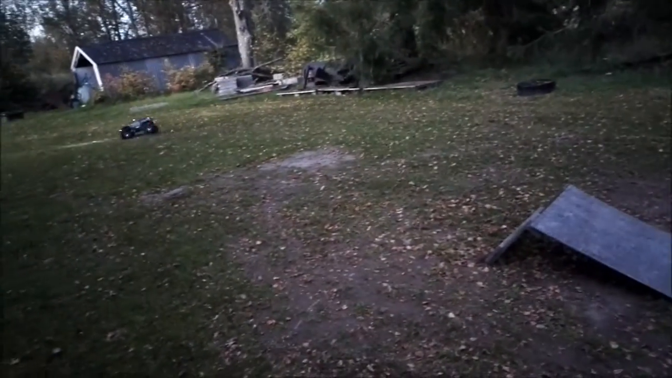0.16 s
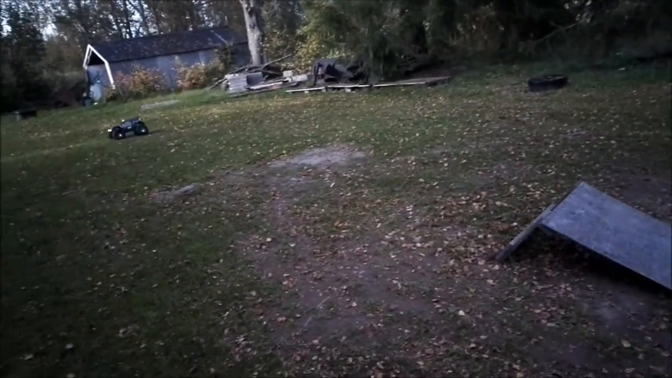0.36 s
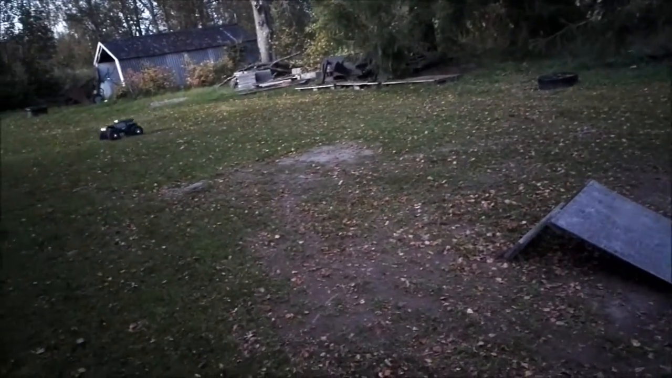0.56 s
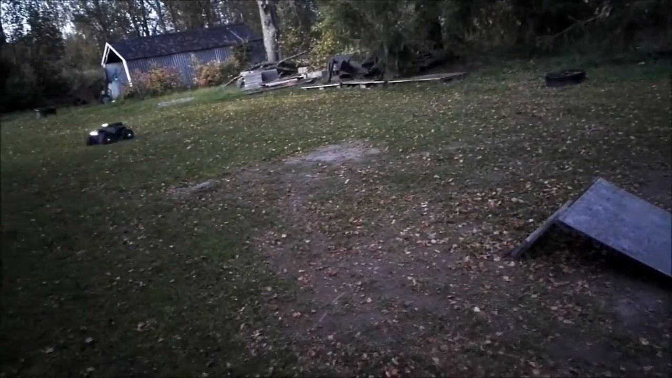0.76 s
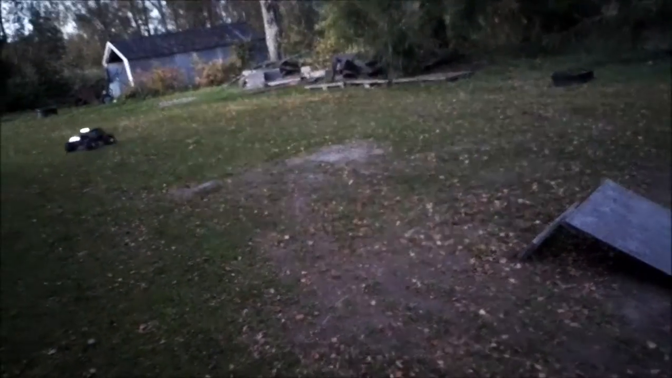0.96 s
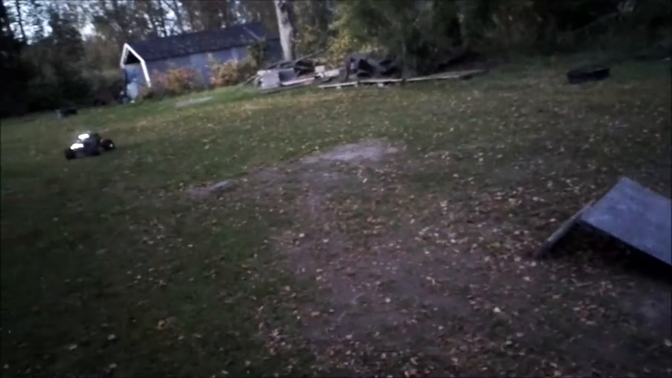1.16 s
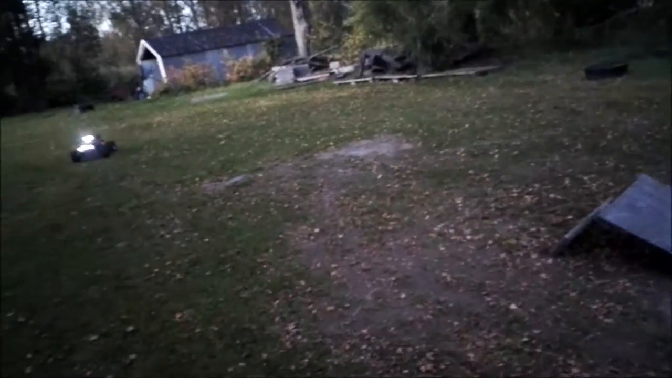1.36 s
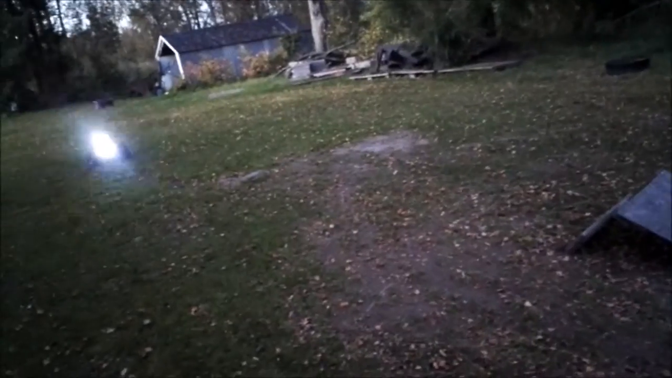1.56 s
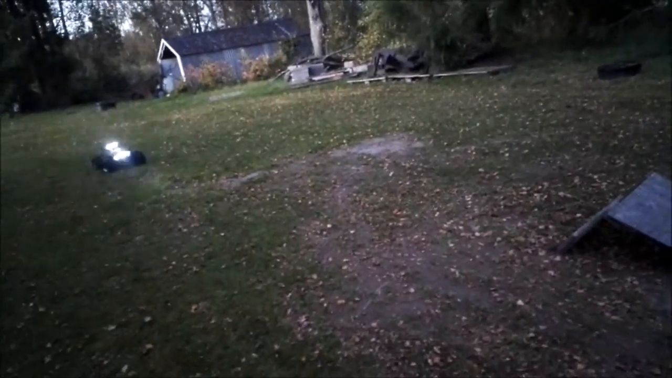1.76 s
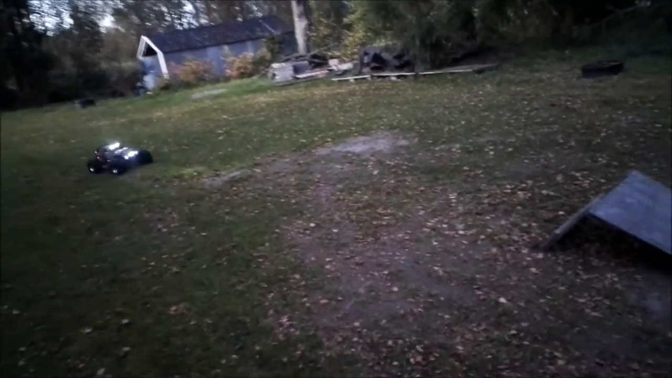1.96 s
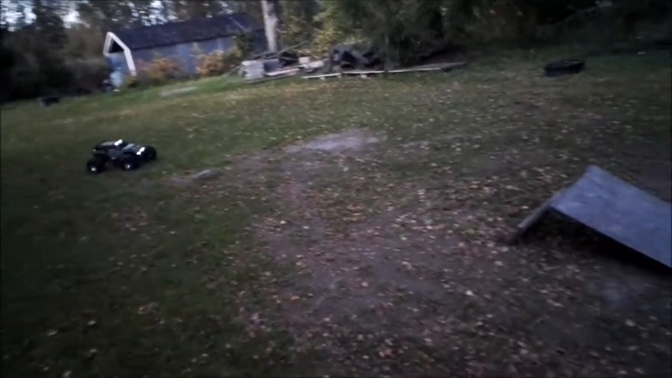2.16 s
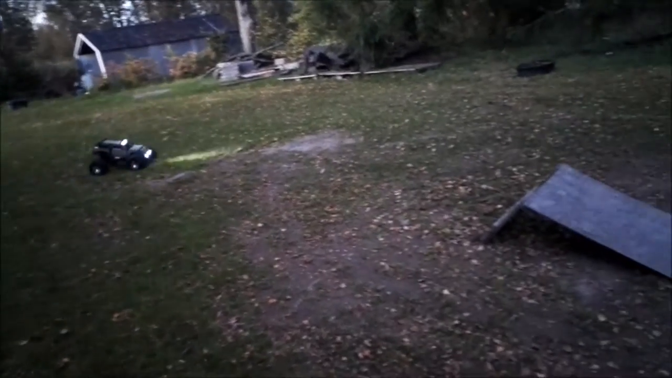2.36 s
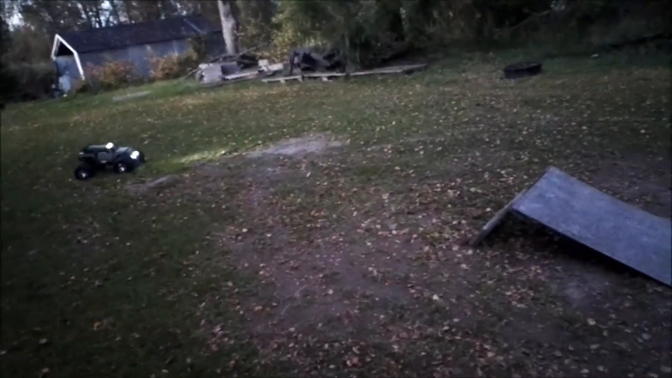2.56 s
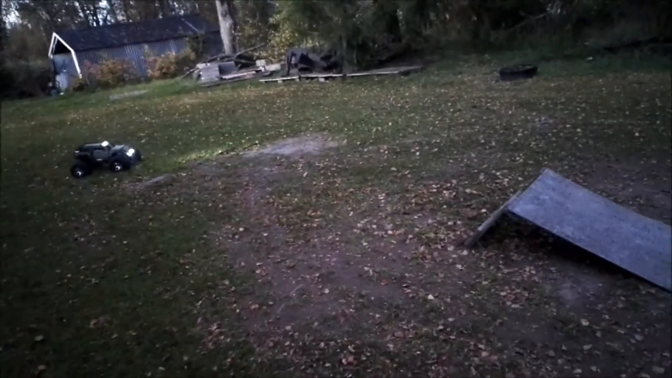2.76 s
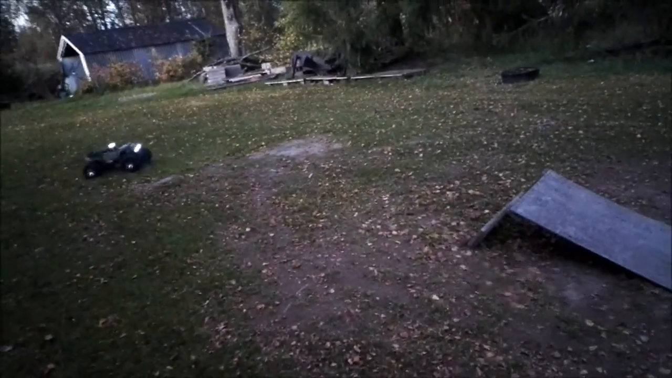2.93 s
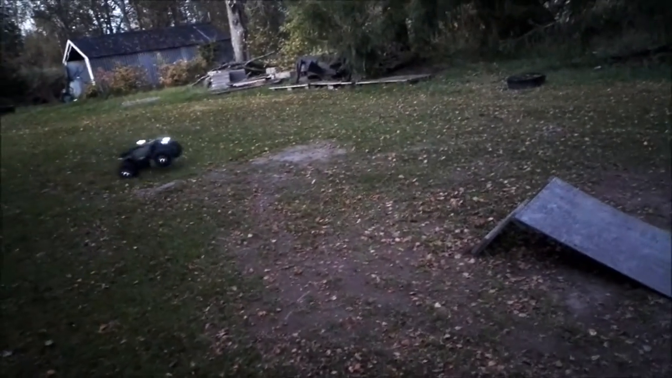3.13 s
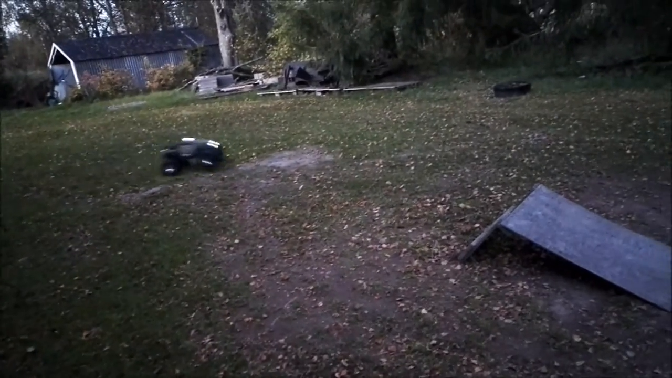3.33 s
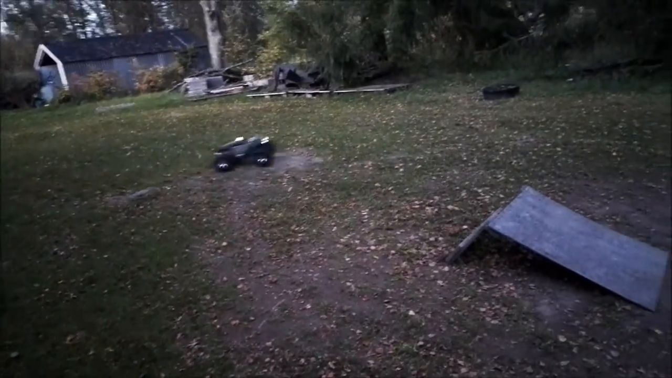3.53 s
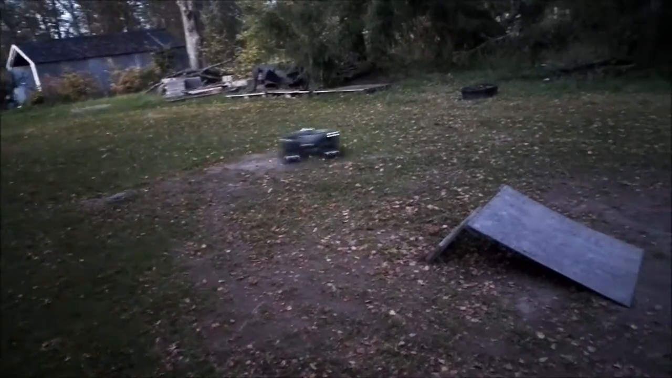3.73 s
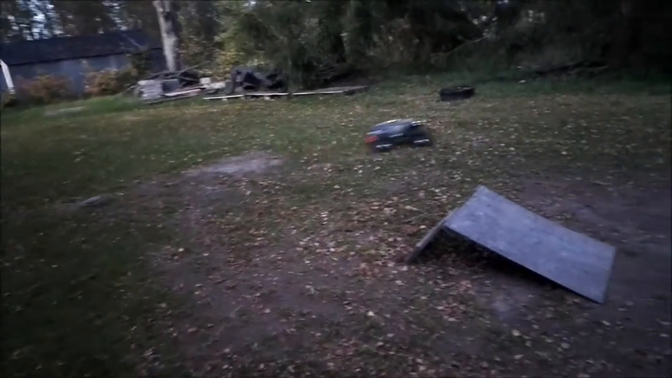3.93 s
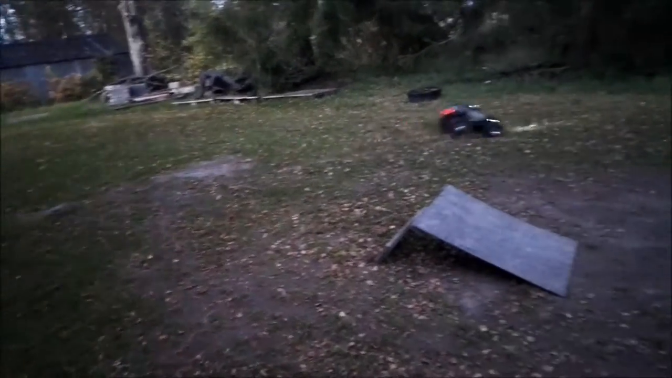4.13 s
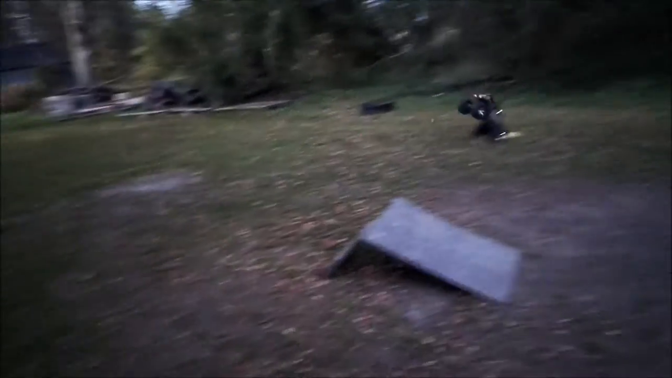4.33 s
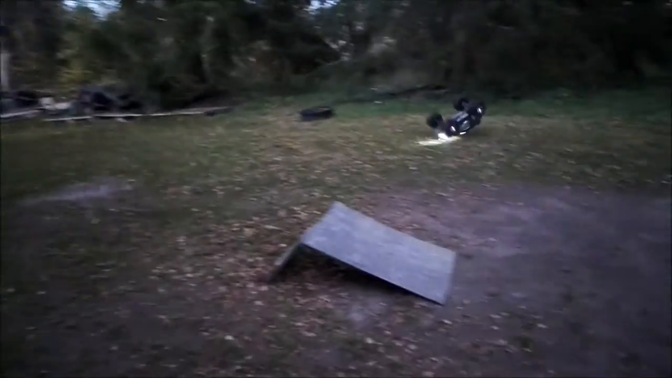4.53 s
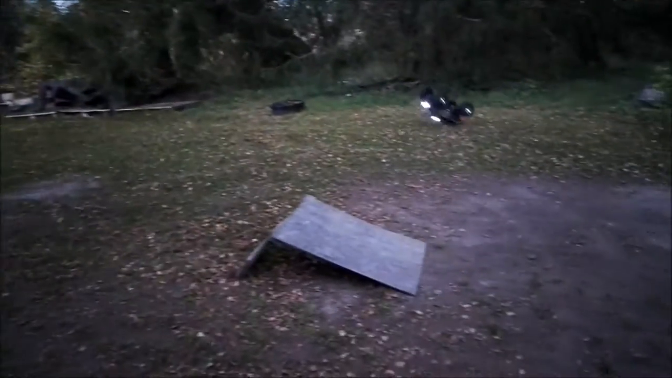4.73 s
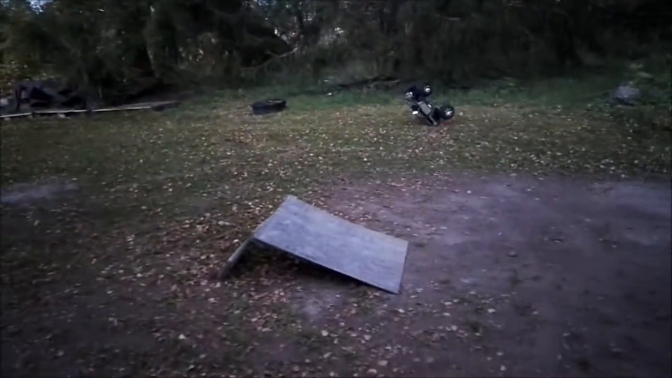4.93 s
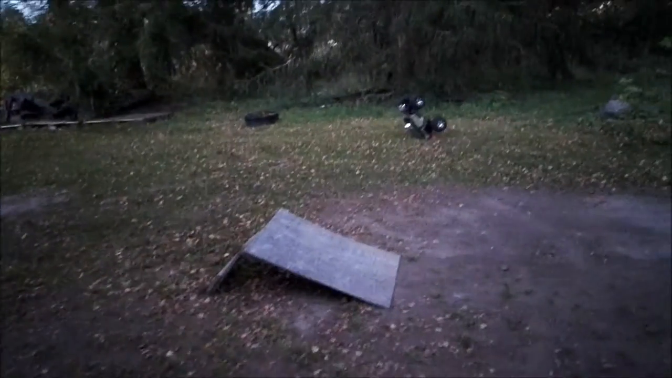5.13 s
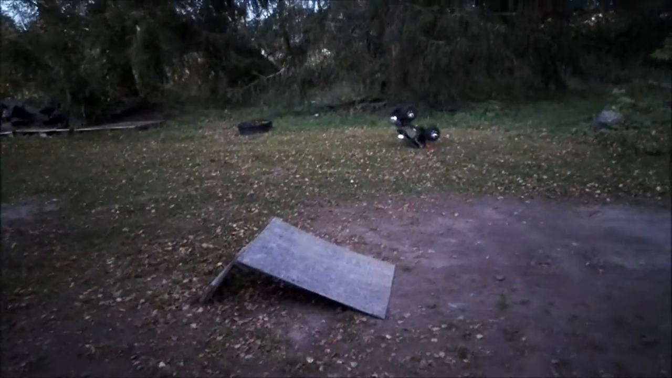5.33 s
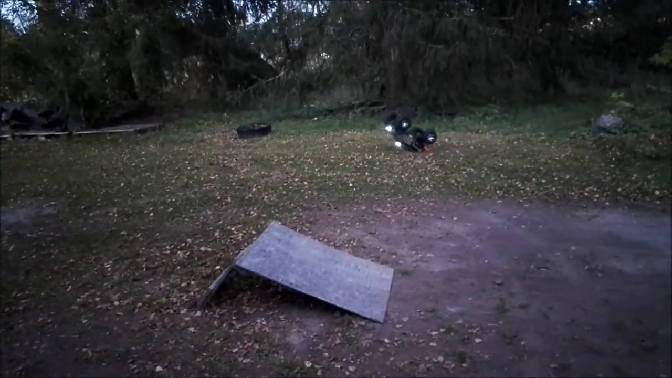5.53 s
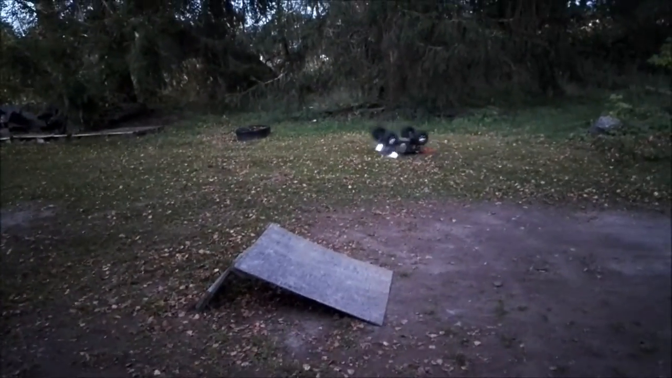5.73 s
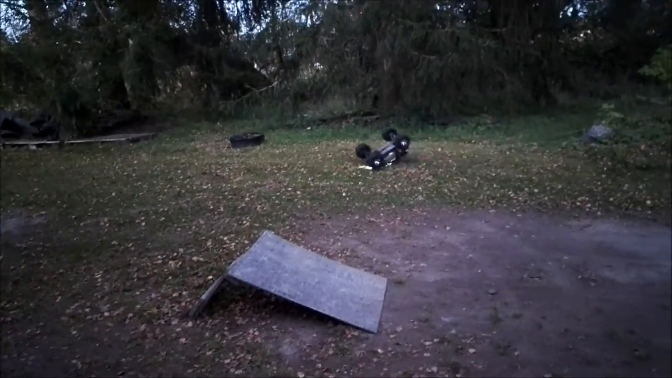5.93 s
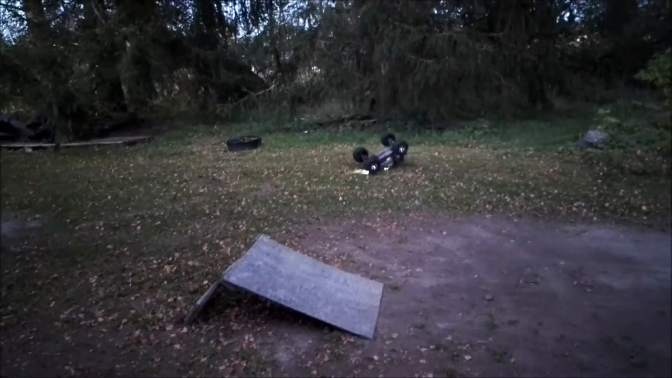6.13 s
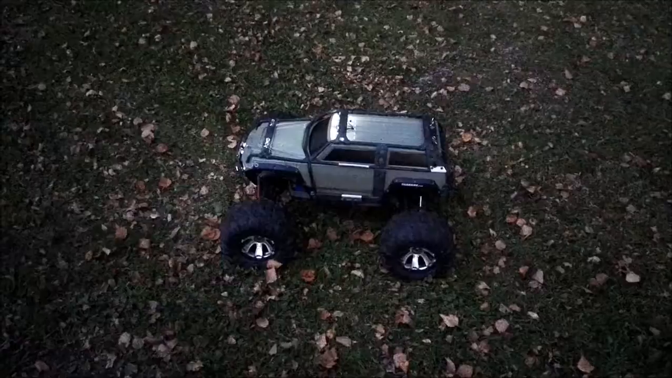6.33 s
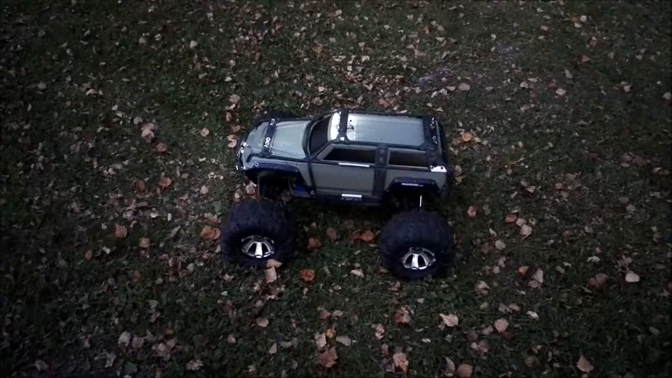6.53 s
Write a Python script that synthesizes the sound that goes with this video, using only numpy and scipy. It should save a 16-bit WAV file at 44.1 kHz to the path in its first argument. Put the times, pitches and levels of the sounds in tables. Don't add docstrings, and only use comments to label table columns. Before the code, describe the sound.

A small electric toy truck whirs and chirps across grass, ratchets as it brakes, whines hard in two bursts, then flips with hollow plastic knocks.

```python
import sys
import numpy as np
from scipy import signal
from scipy.fft import rfft, irfft, next_fast_len
from scipy.io import wavfile
from scipy.ndimage import uniform_filter1d, map_coordinates

SR = 44100
rng = np.random.default_rng(int(sys.argv[2]) if len(sys.argv) > 2 else 0)


def volts_from_decibels(level):
    exponent = np.asarray(level, float) / 20
    return 10 ** exponent


def wav_out(sig):
    wavfile.write(sys.argv[1], SR, np.round(np.clip(np.atleast_2d(sig).T, -1, 1) * 32767).astype(np.int16))


N = 290613
TIME = np.arange(N) / SR
ENGAGE_S = 0.03

# (time [s], gear tooth pitch [Hz], load [dB])
SPRINT = [(3.43, 3955, -48.5), (3.55, 3290, -44.5), (3.59, 3770, -44.5), (3.69, 3945, -41.5),
          (3.76, 3847, -43.5), (3.83, 4010, -42.5), (3.94, 3916, -48)]
# (frequency [Hz], time to fall 60 dB [s])
YARD = [(100, 0.48), (500, 0.43), (2000, 0.55), (6000, 0.51), (14000, 0.36)]


def unit(x):
    return x / np.sqrt(np.mean(x ** 2) + 1e-20)


def along(points, hz):
    f, v = np.transpose(points)
    return np.interp(np.log(hz + 1), np.log(f + 1), v)


def curves(rows):
    s, *cols = np.transpose(rows)
    return [np.interp(TIME, s, c) for c in cols]


def wobble(rate):
    return map_coordinates(rng.standard_normal(int(N * rate / SR) + 4), [TIME * rate])


def bumps(rows):
    return sum(height * np.exp(-((TIME - s) / length) ** 2) for s, height, length in rows)


def filtered(x, response):
    m = next_fast_len(x.shape[-1] + 8192)
    spectrum = rfft(x, m) * response(np.fft.rfftfreq(m, 1 / SR))
    return irfft(spectrum, m)[..., :x.shape[-1]]


def pair(spectrum, alike):
    def mid_side(hz):
        turn = np.arccos(np.clip(along(alike, hz), -1, 1)) / 2
        return volts_from_decibels(along(spectrum, hz)) * [np.cos(turn), np.sin(turn)]

    mid, side = filtered(rng.standard_normal((2, N)), mid_side)
    return unit(np.array([mid + side, mid - side]))


def blips(rows):
    out = np.zeros(N)
    for s, hz, db, length, glide in rows:
        near = slice(round((s - 2 * length) * SR), round((s + 2 * length) * SR))
        u = (TIME[near] - s) / length
        phase = np.cumsum(2 * np.pi * hz * 2 ** (glide * u) / SR)
        out[near] += volts_from_decibels(db) * np.exp(-2 * u ** 2) * np.sin(phase)
    return out


def throttle():
    # (time [s], gear tooth pitch [Hz], load [dB])
    cruise = [(.4, 1052, -61.5), (.62, 1066, -61), (.75, 1230, -59), (.9, 1422, -61.5), (1.3, 1622, -61.5),
              (1.62, 2063, -60), (1.86, 2280, -56), (2.0, 2095, -67), (2.3, 2200, -63.5)]
    dart = [(2.9, 2883, -48), (2.925, 2600, -50), (2.95, 2900, -50), (3.07, 2963, -42.5), (3.13, 3530, -49),
            (3.2, 3970, -46.5), (3.25, 3000, -51)]
    # (time [s], pitch rise [share], lift [dB])
    hops = [(3.105, 0.091, 3), (3.172, .07, 1), (3.432, 0.034, 11.5), (3.66, .06, 2), (3.728, .13, 7),
            (3.79, .05, 0.5), (3.862, 0.072, 6.5)]
    hop_s, fade_db = 0.014, 30

    def faded(burst):
        first, last = burst[0], burst[-1]
        start = (first[0] - ENGAGE_S, first[1], first[2] - fade_db)
        end = (last[0] + 2 * ENGAGE_S, last[1], last[2] - fade_db)
        return [start] + burst + [end]

    mesh_hz, load_db = curves(faded(cruise) + faded(dart) + faded(SPRINT))
    race = 1 + bumps([(s, rise, hop_s) for s, rise, _ in hops])
    return mesh_hz * race, load_db + bumps([(s, db, hop_s) for s, _, db in hops])


def gears():
    # (level [dB], ..)
    order_db = (-0.5, -4.5, -9.5)
    smears = (.9, .35, .5)
    # (frequency [Hz], level [dB])
    housing = [(1000, 0.5), (2200, 4), (4000, 0.5), (6500, -8), (8200, 13), (9800, 0.5), (13000, 4)]
    # (time [s], pitch [Hz], level [dB], length [s], glide [octaves])
    squeals = [(.27, 3200, -64, 0.016, -0.11), (.42, 1050, -43, 0.025, -0.048),
               (.6, 1039, -46.5, 0.074, -0.0072), (2.623, 11600, -54, .01, 0.054),
               (3.465, 2810, -28.5, 0.0125, 0.066), (4.064, 3136, -35.5, 0.0082, .03),
               (4.073, 1900, -42.5, 0.013, -0.066), (4.078, 3670, -46.5, 0.035, -.1),
               (4.145, 2007, -42, 0.018, 0.032), (4.145, 980, -49.5, 0.0288, -0.019),
               (4.155, 3040, -52.5, 0.024, 0.049), (4.31, 3300, -60, 0.013, .03),
               (4.333, 1550, -47, 0.018, -0.063)]
    # (time [s], pitch [Hz], level [dB])
    binds = [(1.08, 3490, -42), (1.2, 3550, -47.5), (1.31, 3620, -47), (1.41, 3600, -53.5),
             (1.51, 3550, -53), (1.61, 3550, -56), (1.71, 3450, -60.5), (1.79, 3920, -46),
             (1.88, 3650, -46), (2.3, 3450, -68)]

    mesh_hz, load_db = throttle()
    axle_hz, axle_db = 0.82 * mesh_hz, load_db - 4
    slow = TIME < 2.5
    unsteady = 1 + 0.008 * wobble(45) + 0.011 * wobble(250) + 0.02 * wobble(12) * slow
    phase = np.cumsum(2 * np.pi * mesh_hz * unsteady / SR)

    axle_db = axle_db + 5 + 4.3 * wobble(9.0) * slow + 1.5 * wobble(60) + 2.7 * wobble(330)
    out = volts_from_decibels(axle_db) * np.sin(np.cumsum(2 * np.pi * axle_hz * unsteady / SR))
    out *= np.where(TIME > 2.5, wobble(900), wobble(250))
    for k, (db, smear) in enumerate(zip(order_db, smears), 1):
        level_db = load_db + db + along(housing, k * mesh_hz)
        level_db = level_db + 5.5 + 3.2 * wobble(60) + 3.6 * wobble(14.1) * slow
        rough = smear * mesh_hz / 2000
        wear = (1 + rough * wobble(900)) / np.sqrt(1 + rough ** 2)
        out += volts_from_decibels(level_db) * wear * np.sin(k * phase)
    out *= TIME < SPRINT[-1][0] + 2 * ENGAGE_S

    chirps = [(s, hz, db, 0.016, -0.09) for s, hz, db in binds]
    return out + volts_from_decibels(5 * wobble(400)) * blips(squeals + chirps)


def rolling():
    # (time [s], drive [dB], tyres [dB])
    turning = [(0, -50.5, -56), (.21, -60.5, -62), (.28, -52, -63), (.48, -58.5, -63), (.7, -52, -63.5),
               (1.1, -50.5, -62.5), (1.65, -48.5, -60.5), (1.95, -48.5, -52.5), (2.04, -51, -53)]
    braking = [(2.13, -48, -61), (2.23, -48.5, -53), (2.35, -56.5, -57), (2.58, -73, -68), (2.84, -78, -75)]
    rush = [(2.865, -41, -65), (2.91, -37.5, -45.5), (3.2, -35.5, -41), (3.23, -40.5, -49.5),
            (3.365, -54, -56)]
    charge = [(3.41, -43.5, -52.5), (3.451, -36.5, -40.5), (3.7, -34.5, -40), (3.89, -37.5, -46.5),
              (4.02, -42.5, -46), (4.24, -50, -45), (4.3, -51, -58.5), (4.57, -69, -66.5),
              (4.62, -90, -97.5)]
    # (time [s], lift [dB], length [s])
    jolts = [(1.08, 1.5, 0.022), (1.71, 4.5, .02), (1.87, 4.5, 0.017), (2.726, 27, .006), (3.175, 2.5, .01),
             (3.385, 11, .01), (4.073, 7.5, .025), (4.14, 1, 0.017), (4.31, 3, 0.028)]
    # (drive share [dB/dB], tyre share [dB/dB], level [dB])
    drone_law = (0.53, 0.31, -51.5)
    hiss_law = (0.91, 0.044, -52.5)
    fizz_law = (1.0, .02, -49.5)
    # (frequency [Hz], density [dB/Hz])
    rumble = [(29, -56), (50, -23.5), (115, -5.5), (199, 0), (306, -2), (450, -16), (580, -33), (990, -120)]
    drone = [(210, -31.5), (350, -11), (472, -8), (577, -1), (991, -1), (1500, -14), (1950, -43.5),
             (3300, -120)]
    hiss = [(710, -41.5), (1200, -13.5), (1800, -1), (2280, 0.5), (3020, -2.5), (4090, -6), (6000, -7.5),
            (7800, -36), (13200, -120)]
    fizz = [(2940, -36), (5000, -5.5), (9050, -0.5), (13000, -4.5), (14600, -15), (14800, -23.5),
            (15000, -70)]
    # (frequency [Hz], likeness [-1..1])
    alike = [(60, 0.84), (300, 0.98), (700, 0.62), (1500, 0.19), (3000, 0.11), (6000, 0.16), (15000, 0.083)]

    drive_db, tyres_db = curves(turning + braking + rush + charge)
    slap_db = bumps(jolts)

    def follow(law):
        drive_share, tyre_share, level_db = law
        reference_db = -50
        return level_db + drive_share * (drive_db - reference_db) + tyre_share * (tyres_db - reference_db)

    rumble_db = tyres_db + 0.46 * slap_db
    drone_db = follow(drone_law) + 0.68 * slap_db
    hiss_db = follow(hiss_law) + slap_db
    fizz_db = follow(fizz_law) + 0.78 * slap_db
    shake, flutter = wobble(17), wobble(350)
    out = volts_from_decibels(rumble_db + 0.76 * shake + 1.0 * wobble(30)) * pair(rumble, alike)
    out += volts_from_decibels(drone_db + 2.0 * shake + 1.5 * wobble(60)) * pair(drone, alike)
    out += volts_from_decibels(hiss_db + 1.8 * shake + 1.4 * flutter + 1.8 * wobble(80)) * pair(hiss, alike)
    out += volts_from_decibels(fizz_db + 0.4 * shake + 0.85 * flutter + 0.87 * wobble(80)) * pair(fizz, alike)
    return out


def knocks():
    # (time [s], peak [dB])
    ratchet = [(2.0532, -13.5), (2.0649, -17.5), (2.0763, -21), (2.0845, -25), (2.0925, -24),
               (2.105, -23.5), (2.113, -29)]
    # (time [s], peak [dB], brightest pitch [Hz], shell thud [dB])
    clacks = [(1.6845, -25.5, 5750, -22), (2.621, -53, 11600, -10), (2.7248, -36, 5100, -7),
              (2.835, -42, 5133, -15), (2.8566, -19, 9590, -29), (3.3744, -19, 9086, -15.5),
              (4.1285, -23, 8990, -19), (6.4877, -43.5, 10270, -20.5)]
    landing = [(4.6003, -22.5, 8440, -5.5), (4.6031, -15.5, 6850, -8), (4.6114, -15, 4240, -12.5),
               (4.6177, -13.5, 7240, -15), (4.6238, -9, 4620, -17.5), (4.6405, -3.5, 7800, -14),
               (4.6436, -3, 2830, -24.5), (4.6509, -15.5, 3370, -9.5), (4.916, -27, 9060, -13)]
    rollover = [(5.8067, -29, 4200, -13), (5.8138, -23.5, 2480, -13), (5.8272, -12, 7000, -17),
                (5.833, -22.5, 3600, -3), (5.8404, -15.5, 10700, -21), (5.8522, -29.5, 2780, -5.5),
                (6.1821, -36, 2990, -15), (6.2118, -44.5, 3660, -2.5), (6.2248, -36.5, 4730, -11)]
    # (pitch [Hz], level [dB], time to fall 60 dB [s])
    shell = [(140.4, -10, 0.026), (239.5, 0, 0.049), (327, -1, 0.045), (565.4, 2, 0.06), (660, 0.5, 0.059),
             (804, -1.5, 0.049), (1550, -8.5, 0.033)]

    blows = [(s, db, 5180, -27.5, 13.3) for s, db in ratchet]
    for rows, crack_ms in ((clacks, 13.5), (landing, 22.2), (rollover, 14.3)):
        blows += [(*row, crack_ms) for row in rows]
    out, t = np.zeros(N + SR), TIME[:SR // 8]
    for s, db, hz, thud_db, crack_ms in blows:
        def colour(f):
            bright = 1 / (1 + (np.log(f / hz + 1e-9) / 0.12) ** 2)
            return f * f / (f * f + 2000 ** 2) * (0.63 + bright)

        crack = unit(filtered(rng.standard_normal(len(t)), colour))
        crack = crack * volts_from_decibels(-60000 * t / np.clip(crack_ms, 4, 40)) * (1 - np.exp(-t / 0.00075))
        ring = np.zeros(len(t))
        for f, level, decay in shell:
            envelope = volts_from_decibels(level + rng.normal(0, 3.1) - 60 * t / decay)
            ring += envelope * np.sin(2 * np.pi * f * (1 + rng.normal(0, 0.053)) * t)
        ring *= 1 - np.exp(-t / 0.0016)
        out[round(s * SR) - 30:][:len(t)] += volts_from_decibels(db - 1.0) * crack + volts_from_decibels(db + thud_db - 2.0) * ring
    return out[:N]


def servo():
    # (multiple of the switching rate, level [dB])
    tones = [(1, -70), (2, -67), (3, -78), (4, -63), (5, -74), (6, -56), (7, -61), (8, -62)]
    # (time [s], level [dB], pitch [Hz], length [s], glide [octaves])
    ticks = [
        (6.496, -36, 12200, 0.0052, 0.011),
        (6.5, -51.5, 13110, 0.0014, .01),
        (6.575, -41, 13100, .005, 0.012),
    ]
    switch_hz = 1705.3
    song = sum(volts_from_decibels(db) * np.sin(2 * np.pi * k * switch_hz * TIME + k * k) for k, db in tones)
    ticking = blips([(s, hz, db, length, glide) for s, db, hz, length, glide in ticks])
    return (TIME > 6.3) * (song + ticking)


def spread(x):
    # (time [s], lead [ms])
    lead = [(0, 0.26), (3.3, 0.21), (3.8, 0.058), (4.2, -0.077), (6.3, -0.02), (6.59, 0.1)]
    shift = curves(lead)[0] * SR / 2000
    left, right = x * np.ones((2, 1))
    return np.array([map_coordinates(left, [np.arange(N) + shift]),
                     map_coordinates(right, [np.arange(N) - shift])])


def turf(x):
    t = TIME[:SR // 40]
    noise = rng.standard_normal((2, len(t))) * volts_from_decibels(-60 * t / 0.022)
    tail = filtered(noise, lambda hz: hz ** 2 / (hz ** 2 + 900 ** 2))
    return signal.fftconvolve(x[None], tail / np.linalg.norm(tail[0]), axes=1)[:, :N]


def yard(x):
    hz, t, z = signal.stft(rng.standard_normal((2, SR)), SR, nperseg=256)
    envelope = volts_from_decibels(-60 * t / along(YARD, hz)[:, None]) * (1 - np.exp(-t / 0.01))
    tail = signal.istft(z * envelope, SR, nperseg=256)[1]
    late = np.pad(x, (500, 0))[None]
    return signal.fftconvolve(late, tail / np.linalg.norm(tail[0]), axes=1)[:, :N]


def scatter(x):
    # (frequency [Hz], level [dB])
    echo = [(70, -33), (200, -10), (600, -5.5), (1400, -9.5), (3000, -5.5), (6000, -7.5), (14000, -11.5)]
    hz, t, z = signal.stft(x, SR, nperseg=256)
    energy = uniform_filter1d(np.abs(z) ** 2, size=9, axis=0)
    late = np.maximum(t[:300] - 0.02, 0)
    tail = volts_from_decibels(-120 * late / along(YARD, hz)[:, None]) * (1 - np.exp(-late / 0.0028))
    wash = signal.fftconvolve(energy, tail / tail.sum(1, keepdims=True), axes=1)[:, :len(t)]
    noise = signal.stft(rng.standard_normal((2, N)), SR, nperseg=256)[2]
    level = 13 * np.sqrt(np.abs(wash)) * volts_from_decibels(along(echo, hz))[:, None]
    return signal.istft(noise * level, SR, nperseg=256)[1][:, :N]


def background():
    # (frequency [Hz], density [dB/Hz])
    air = [(12, -37), (20, -10.5), (92, -10), (108, -13.5), (160, -3.5), (347, -11.5), (457, -12.5),
           (525, -11.5), (796, -7.5), (1880, -13), (2690, -28), (13800, -25.5), (15000, -35.5)]
    # (frequency [Hz], likeness [-1..1])
    air_alike = [(60, 0.66), (130, 0.86), (290, 0.9), (640, 0.12), (1410, -0.69), (3100, 0.9), (6820, 0.03),
                 (15000, 0.22)]
    return volts_from_decibels(-55 + 0.59 * wobble(2.916) + 1.2 * wobble(12)) * pair(air, air_alike)


def ports(x, balance):
    return filtered(x, lambda hz: volts_from_decibels(along(balance, hz) * [[0.5], [-0.5]]))


def scene():
    # (frequency [Hz], difference [dB])
    truck_balance = [(60, -0.5), (110, 0.5), (200, -0.5), (380, 0.5), (700, 1.5), (1290, -0.5), (2380, -1),
                     (4400, -4.5), (8120, -6), (15000, 10.5)]
    air_balance = [(60, 0.5), (180, -0.5), (550, 0), (1650, -3.5), (4970, -4.5), (15000, -4.5)]
    whine, blows = gears(), knocks()
    direct = spread(whine + blows + servo() + rolling())
    grass = turf(volts_from_decibels(-4) * whine + volts_from_decibels(-3) * blows)
    truck = direct + grass + volts_from_decibels(-8.5) * yard(whine) + scatter(blows)
    return ports(truck, truck_balance) + ports(background(), air_balance)


def starve(x):
    # (frequency [Hz], threshold [standard deviations])
    starved = [(2300, 3.5), (3000, 1.8), (4500, 1.4), (6000, 1.9), (8500, 2.8), (13000, 2.7)]
    hz, _, z = signal.stft(x, SR, nperseg=1024)
    patches = uniform_filter1d(rng.standard_normal(z.shape), size=7, axis=2)
    chance = unit(uniform_filter1d(patches, size=5, axis=1))
    kept = np.where(chance > along(starved, hz)[:, None], 0.03, 1)
    return signal.istft(z * kept, SR, nperseg=1024)[1][:, :N]


def roll_off(x):
    return signal.sosfilt(signal.butter(12, 15600, fs=SR, output="sos"), x)


def record(dry):
    # (time [s], gain)
    edit = [
        (0, 1),
        (6.231, 0.99),
        (6.235, 0),
        (6.37, 0),
        (6.59, 0.46),
    ]
    top_hz = 14350
    rounded = dry / (1 + np.abs(dry / 0.9) ** 6) ** (1 / 6)
    band = filtered(starve(rounded), lambda hz: volts_from_decibels(np.clip((top_hz - hz) / 6, -70, 0)))
    return roll_off(band * curves(edit)[0])


dry = scene()
out = record(dry)
wav_out(out)
```